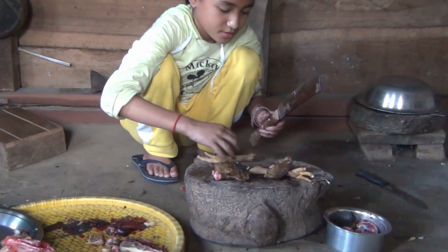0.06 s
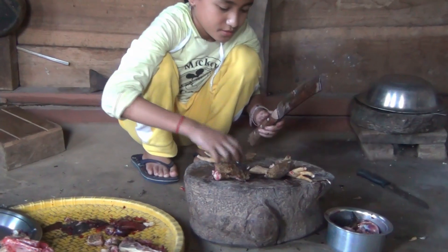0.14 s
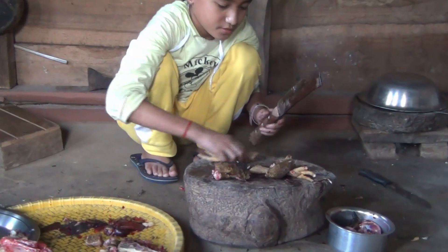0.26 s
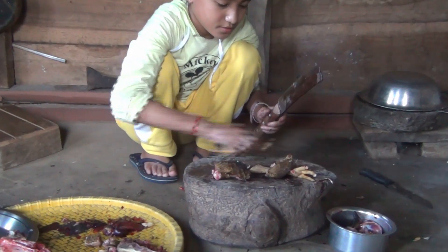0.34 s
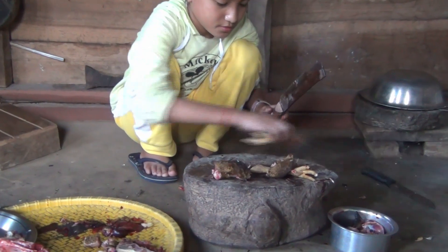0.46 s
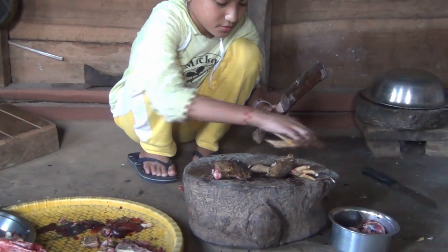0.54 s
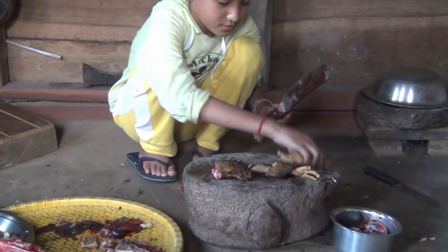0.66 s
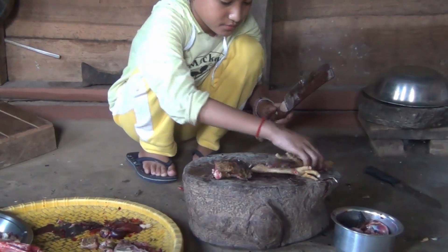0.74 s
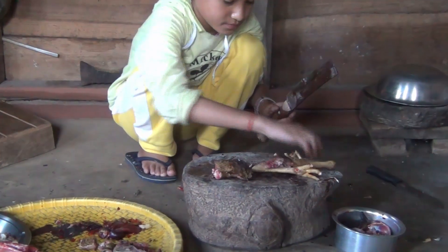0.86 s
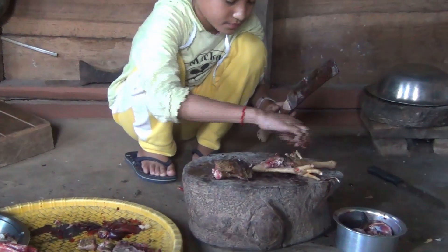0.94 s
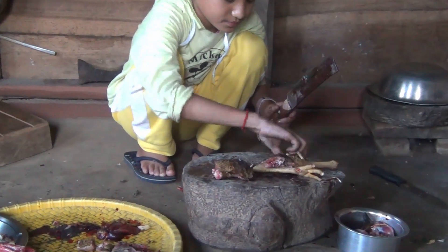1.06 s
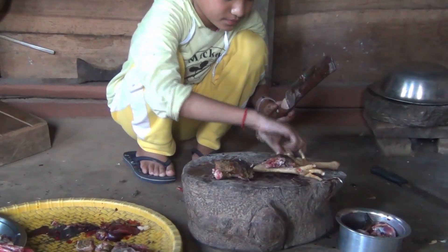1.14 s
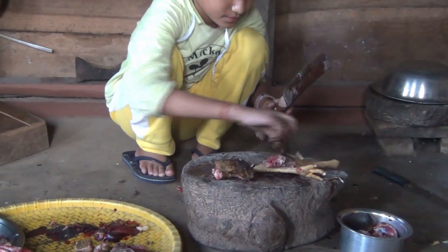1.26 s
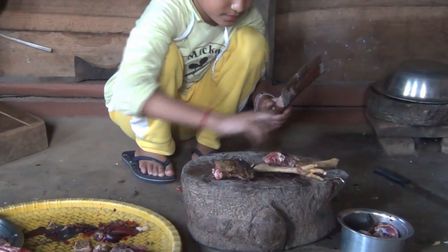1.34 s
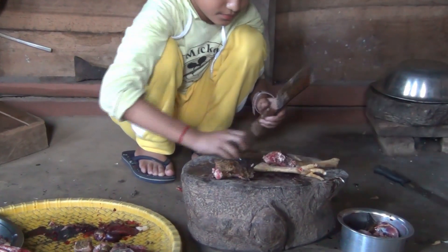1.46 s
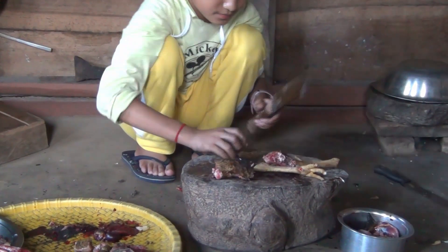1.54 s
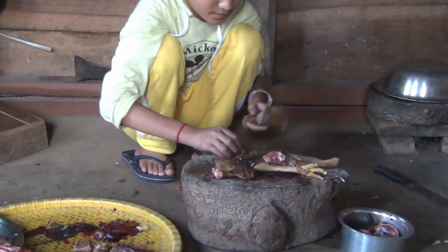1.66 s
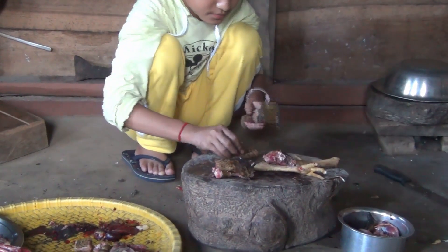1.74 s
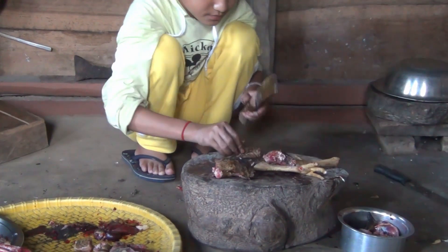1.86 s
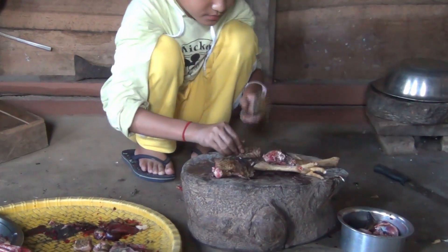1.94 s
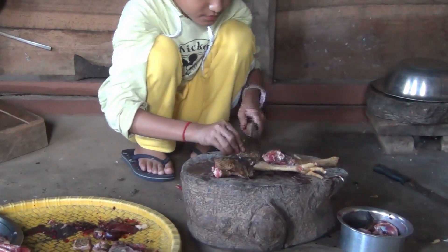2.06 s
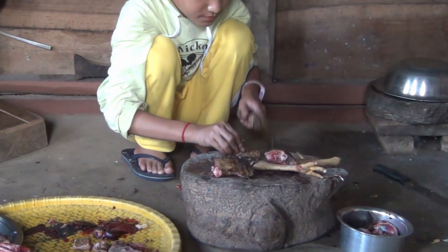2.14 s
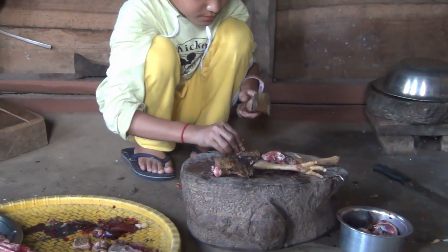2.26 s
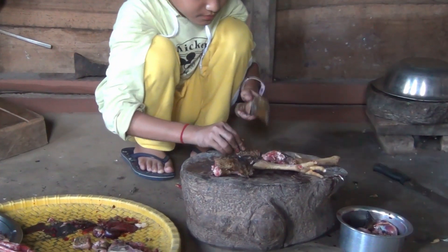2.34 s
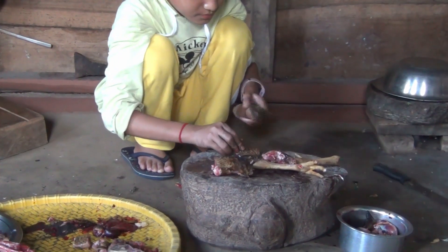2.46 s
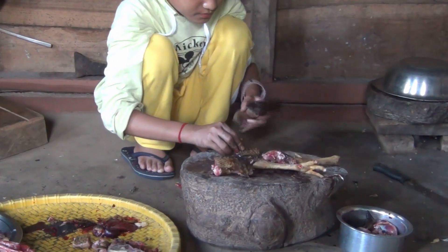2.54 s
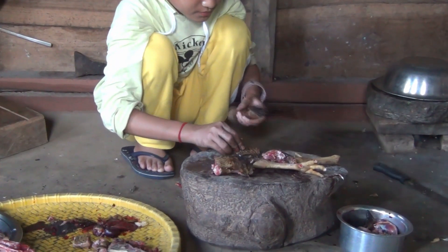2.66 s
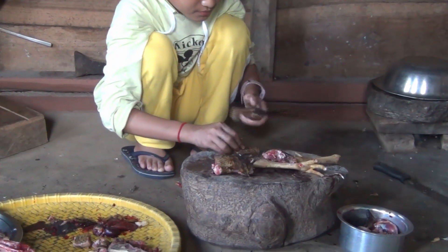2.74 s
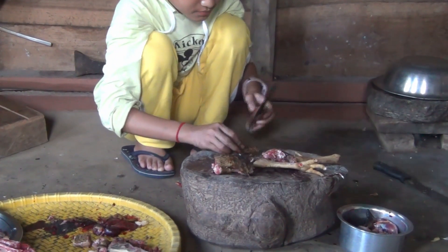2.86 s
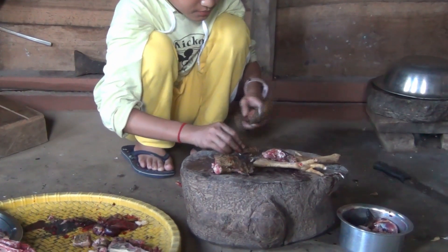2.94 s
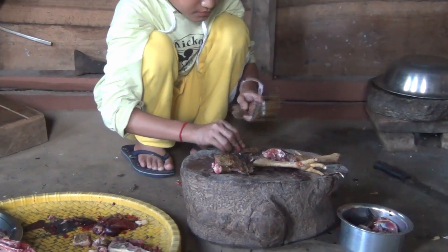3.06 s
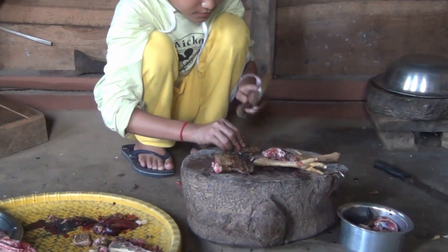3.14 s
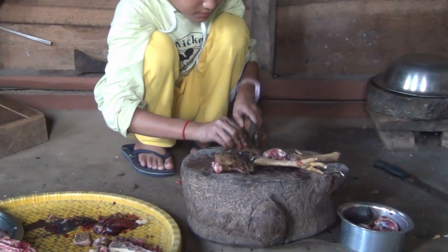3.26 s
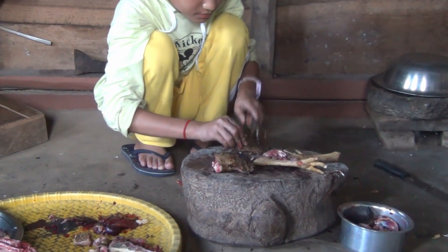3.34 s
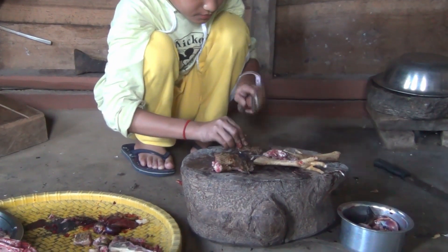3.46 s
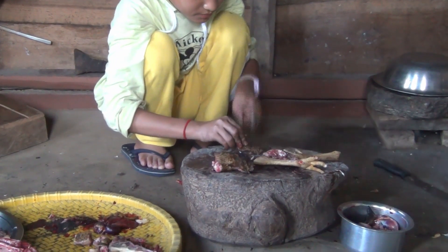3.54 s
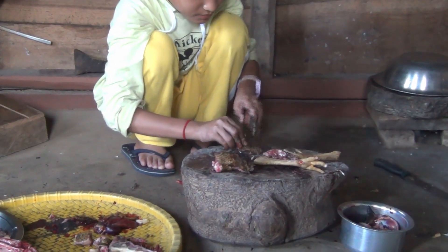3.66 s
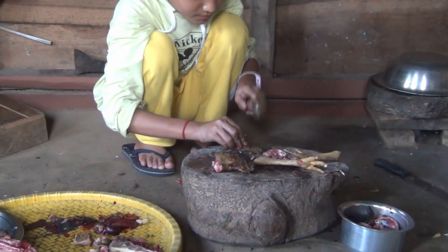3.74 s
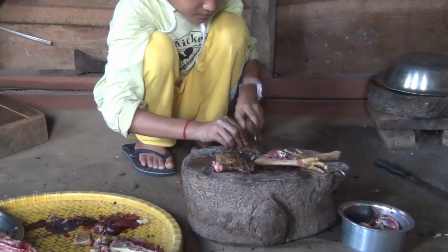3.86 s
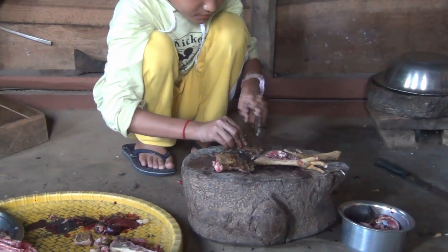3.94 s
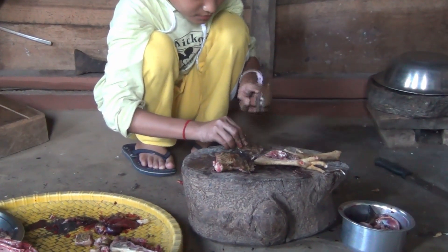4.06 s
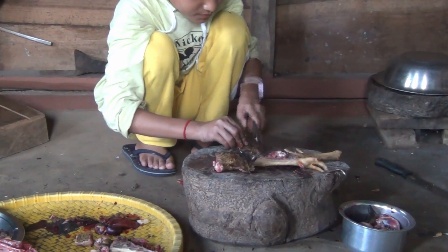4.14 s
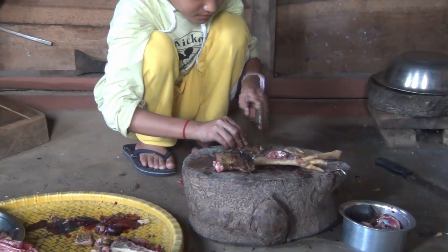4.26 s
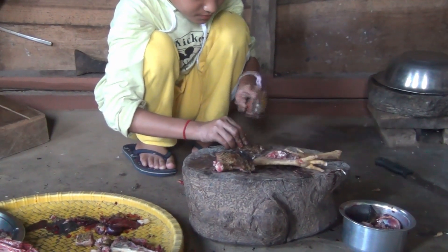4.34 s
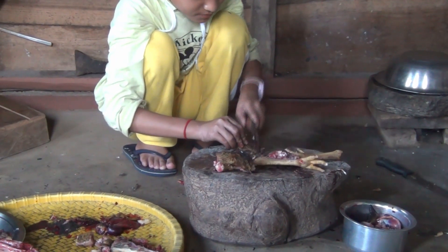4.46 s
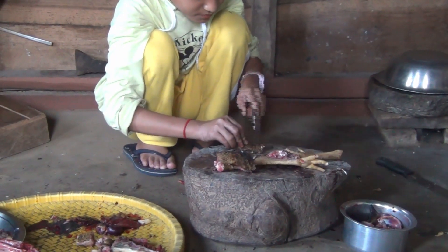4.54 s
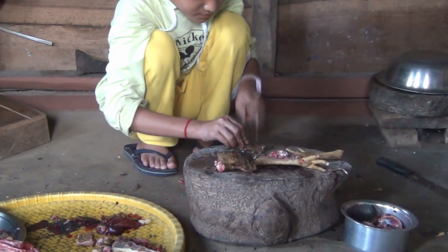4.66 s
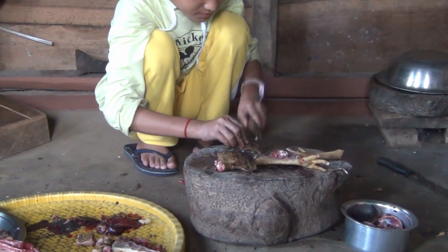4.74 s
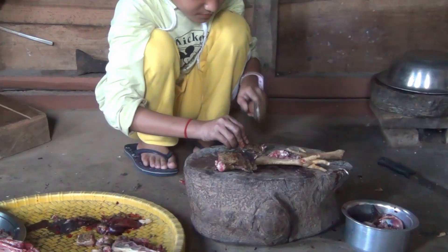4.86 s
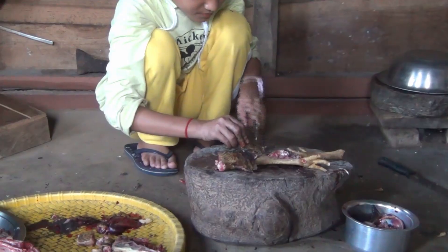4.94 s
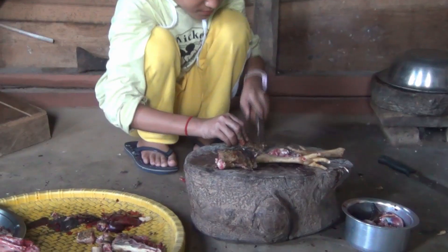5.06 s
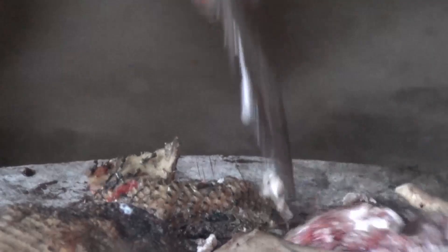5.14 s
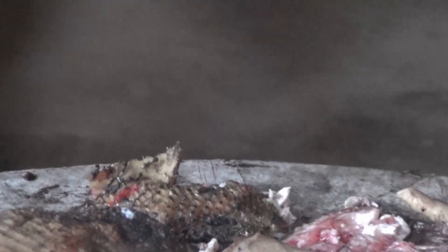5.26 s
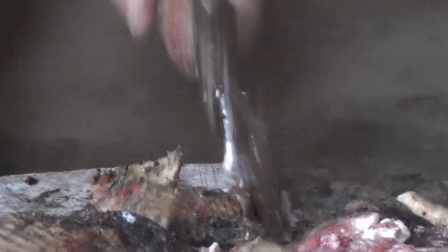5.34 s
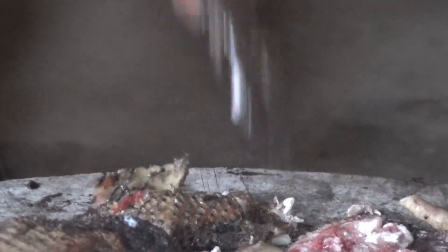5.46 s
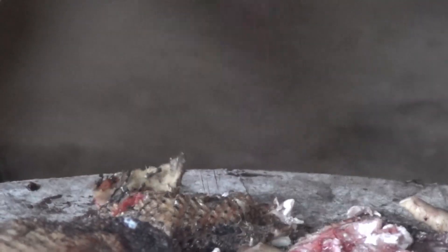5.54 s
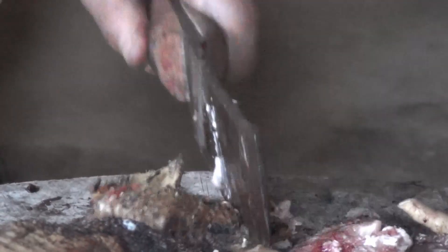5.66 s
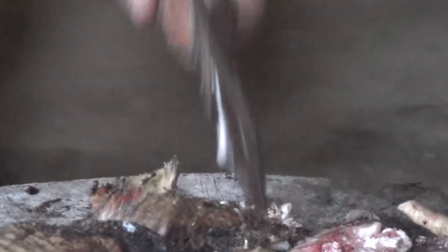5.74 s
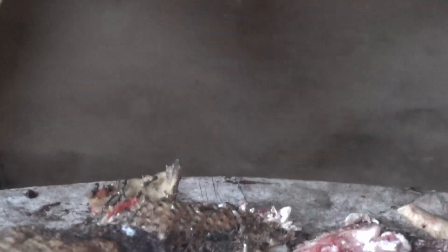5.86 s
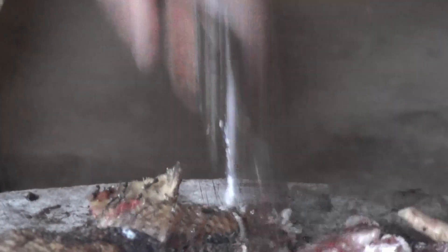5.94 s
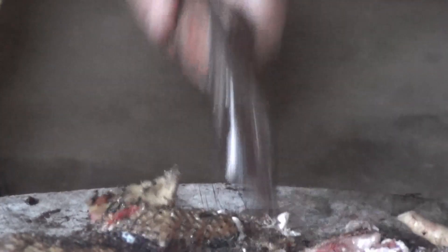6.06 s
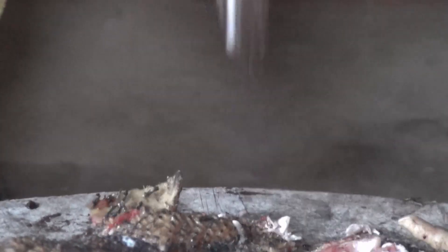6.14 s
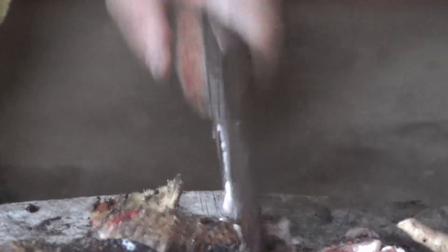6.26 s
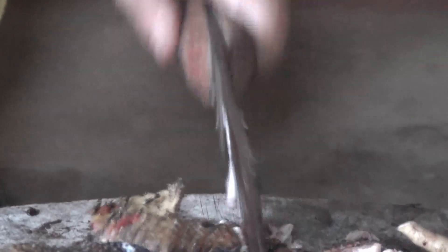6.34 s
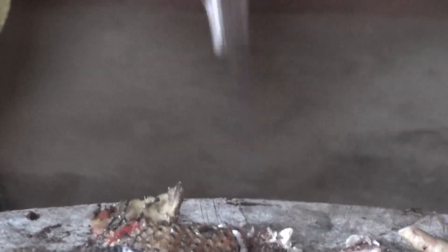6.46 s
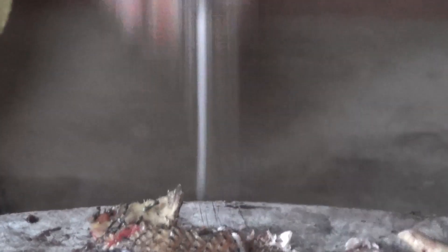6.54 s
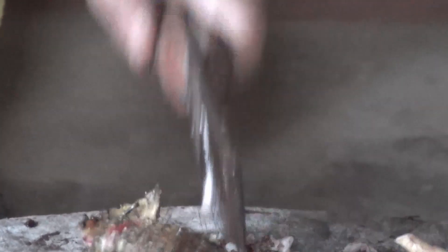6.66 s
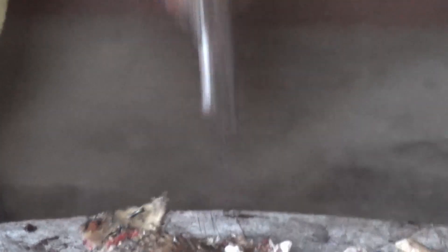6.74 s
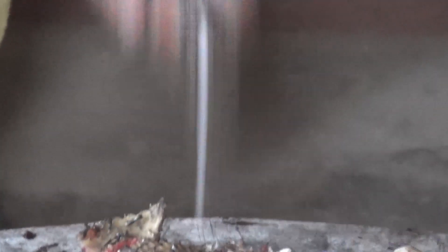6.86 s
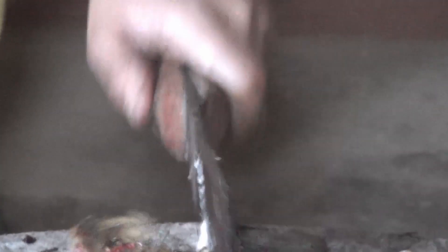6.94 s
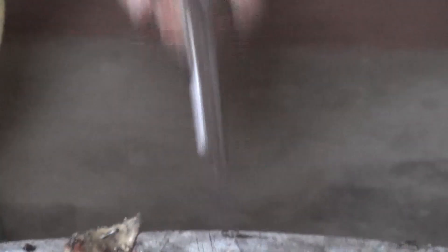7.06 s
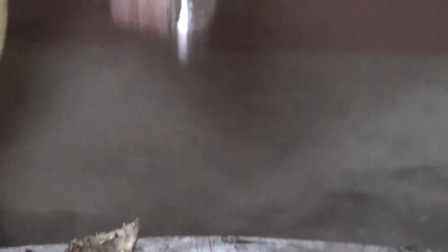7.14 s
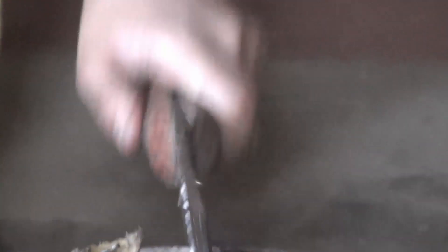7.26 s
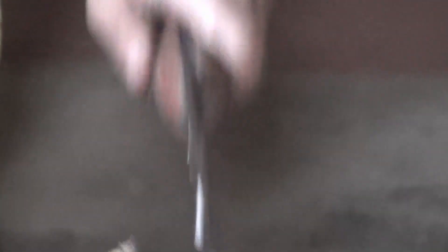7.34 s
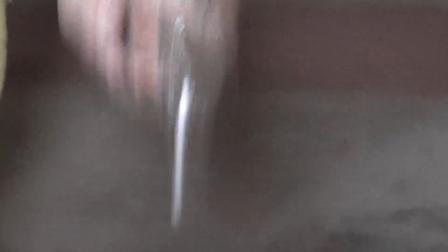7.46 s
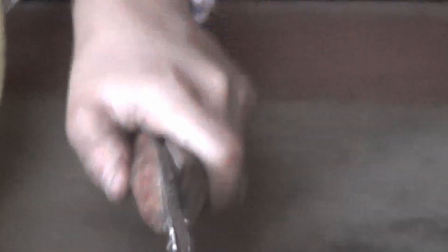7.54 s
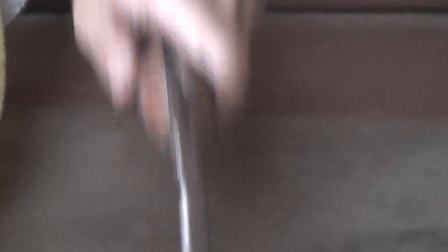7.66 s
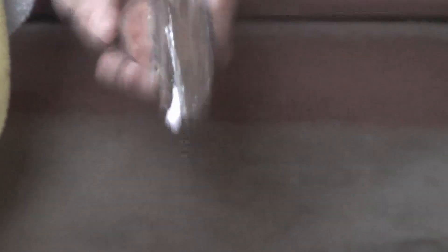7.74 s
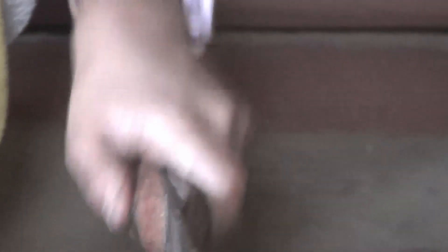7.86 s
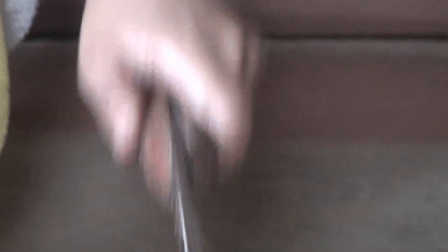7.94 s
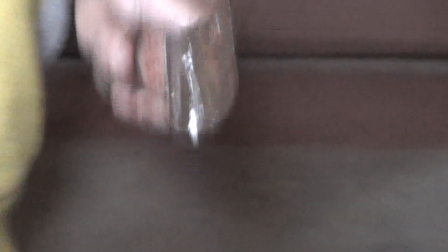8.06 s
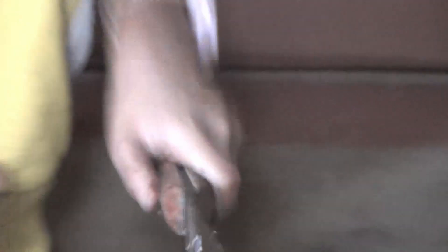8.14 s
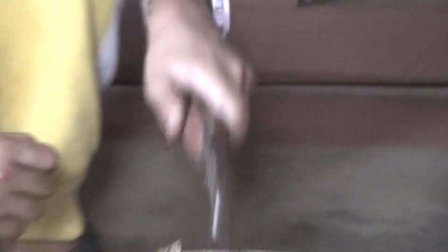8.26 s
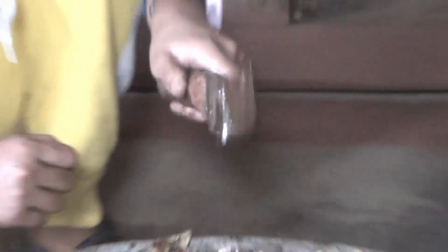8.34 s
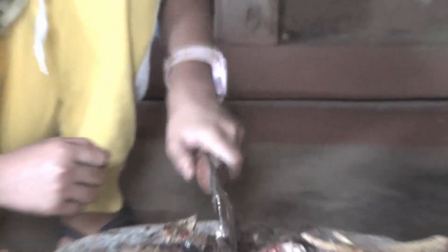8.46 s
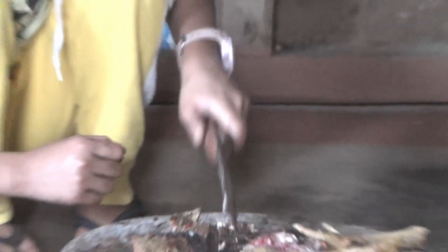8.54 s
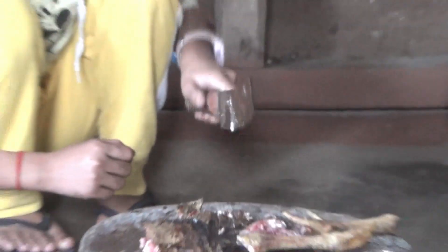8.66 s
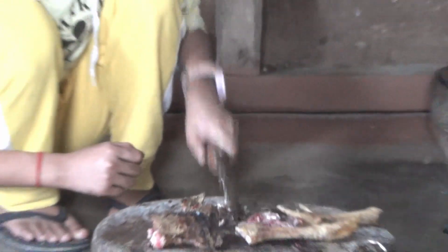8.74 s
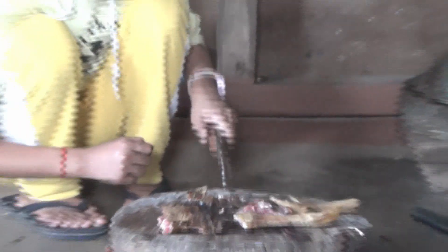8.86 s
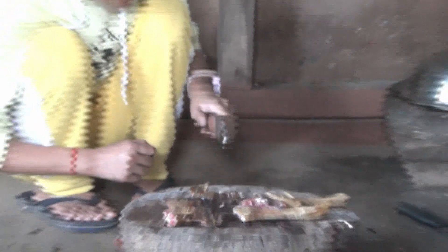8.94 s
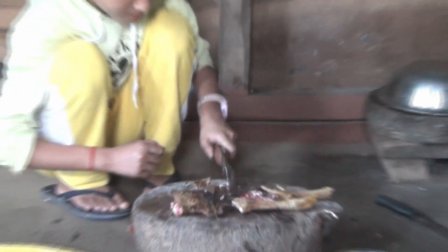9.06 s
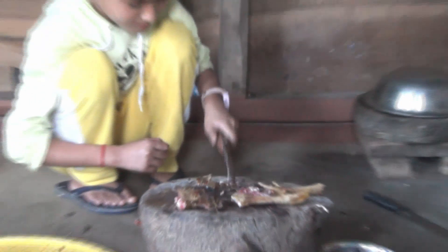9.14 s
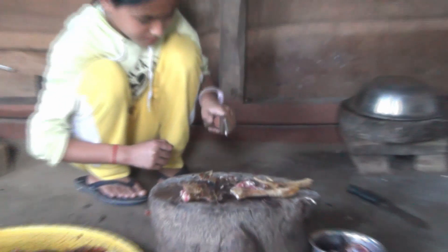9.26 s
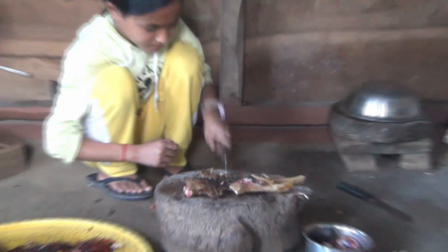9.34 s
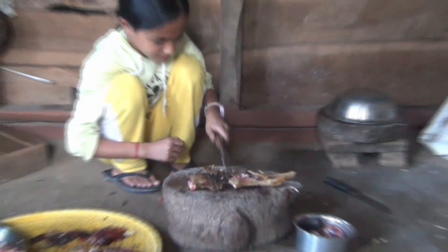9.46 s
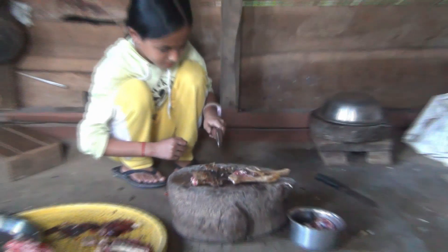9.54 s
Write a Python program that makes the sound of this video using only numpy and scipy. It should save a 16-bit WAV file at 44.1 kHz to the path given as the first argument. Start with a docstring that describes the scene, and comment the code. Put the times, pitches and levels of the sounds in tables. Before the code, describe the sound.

Quiet insect drone and airy hush with faint sticky touches of meat, then one deep trial thud on a wooden stump. After a short pause, a heavy knife begins chopping steadily, about three blows a second, crunching flesh, cracking bone and knocking wood. The microphone is close, in a plank-walled shelter with short reflections; the background sinks behind the blows.

```python
"""Chopping on a wooden stump

A heavy knife chops meat and bone in a plank-walled yard shelter: one trial blow, then about three a second.
Each blow crunches through flesh, cracks on bone or wood and thuds into the stump; walls and roof answer.
Blows are shaped pulses, splintering noise and decaying modes; small clicks and sticky touches are noise too.
Behind them cicadas drone, a bush cricket pulses and the air hums, all filtered noise; a limiter tames peaks."""
import sys
import numpy as np
from scipy import signal
from scipy.fft import rfft, irfft, next_fast_len
from scipy.io import wavfile
from scipy.ndimage import uniform_filter1d, minimum_filter1d, map_coordinates

SR = 44100
rng = np.random.default_rng(int(sys.argv[2]) if len(sys.argv) > 2 else 0)


def unload_audio(sound):
    """Save the sound as a 16-bit wav file, at the path given as the first command line argument."""
    columns = np.transpose(np.atleast_2d(sound))
    # keep every value between -1 and 1, then stretch to whole-number steps
    steps = np.round(np.clip(columns, -1, 1) * 32767)
    wavfile.write(sys.argv[1], SR, steps.astype(np.int16))


N = 423620

# Knife blows, by the energy each part takes. Each row: start in seconds, low push in dB, stump thud in dB,
# bone crack in dB, edge snap in dB.
KNIFE_BLOWS = [(2.081, 9, 23, 12, -1), (3.317, -3.5, 3.5, 8, 12), (3.6276, -1, 1.5, 15, 9.5),
               (3.9094, -1, 3, 4, 1.5), (4.195, 2, 11.5, 11, 11), (4.4666, -3.5, -8.5, 12.5, 14),
               (4.75, 5, 14.5, 7, -2), (5.0161, 2.5, 7, 6.5, 10), (5.141, -12, 6, -12, -22),
               (5.3932, 3, 10, 0, 0.5), (5.701, 2, 18, 15.5, 5), (6.0009, 0.5, 14, 5, 2.5),
               (6.3118, 4, 21, 16.5, 10.5), (6.6224, 2, -1, 5.5, 3.5), (6.9402, 4.5, 6, 6.5, 9),
               (7.2574, 2, -1.5, 9.5, 12), (7.557, 1.5, -1, 5.5, 11.5), (7.872, 4, 6.5, 12, 12),
               (8.1859, 4.5, 19, 14, 9.5), (8.4832, 3, 16.5, 14.5, 11), (8.8053, 3.5, 17.5, 13.5, 13.5),
               (9.0989, 1.5, 21.5, 15, 10.5), (9.4193, 0, 22, 14.5, 3)]
# Small dry clicks close by. Each row: start in seconds, energy in dB.
NEAR_CLICKS = [(1.424, -9), (2.0715, -7), (4.9468, 0.5), (4.9734, -4), (5.1299, -2.5), (9.381, -21)]
# Modes of the stump and shelter booming together. Each row: frequency in Hz, relative level in dB,
# 60 dB decay in seconds.
BOOM_MODES = [(193.3, -8, 0.18), (258.7, -15, 0.41), (352.5, -11, 0.27), (394, -5, 0.2), (462, -8, 0.21),
              (501, -5.5, 0.16), (538, -4.5, 0.18), (626.4, 2.5, 0.084), (662, -3.5, 0.24),
              (730, -2.5, 0.21), (783, -15, 0.17), (903, -21, 0.099), (960, 7, 0.045), (1005, -8, 0.17),
              (1102, -9, 0.17), (1220, -22, 0.25), (1635, -16, 0.098), (1794, -19, 0.18)]
# Modes of the steel blade, damped by hand and meat. Each row: frequency in Hz, relative level in dB,
# 60 dB decay in seconds.
BLADE_MODES = [(2050, -3, 0.065), (2604, -5.5, 0.11), (3680, -12, 0.056), (4880, -8.5, 0.18),
               (7400, -10, 0.13), (10060, -6.5, 0.071), (10600, -24, .22)]
# Colour of the low push of a blow. Each row: frequency in Hz, relative level in dB.
PUSH_COLOUR = [(20, -40), (60, -12.5), (85, -7), (112, -1.5), (190, 0.5), (240, -7), (320, -9), (600, -34),
               (2500, -79)]
# Colour of the knock on the stump. Each row: frequency in Hz, relative level in dB.
THUD_COLOUR = [(40, -56), (150, -24.5), (330, -5), (520, 4), (740, 5), (1020, -4), (1300, -7), (2000, -35),
               (5000, -39), (12000, -76)]
# Colour of the bone crack. Each row: frequency in Hz, relative level in dB.
CRACK_COLOUR = [(60, -50), (500, -17.5), (1250, -12), (1750, 2.5), (2100, -2), (2400, -4), (2900, -0.5),
                (4200, -3.5), (6000, -14.5), (14000, -33)]
# Colour of the edge snap. Each row: frequency in Hz, relative level in dB.
SNAP_COLOUR = [(200, -67), (2500, -18), (5000, -1), (7300, 4), (8600, 0), (10500, 2.5), (13000, -3),
               (15000, -9), (16000, -28)]
# Colour of the near clicks. Each row: frequency in Hz, relative level in dB.
CLICK_COLOUR = [(300, -7), (900, -9), (1600, -2), (2400, -8), (3300, -6), (4500, -25), (14000, -43)]
# Diffuse tail of the shelter. Each row: frequency in Hz, 60 dB decay in seconds.
SHELTER_DECAY = [(100, 0.32), (260, 0.46), (700, 0.31), (1840, .23), (4850, 0.21), (12800, .18)]
# Distinct wall echoes. Each row: delay in seconds, gain before the wall setting of each sound.
WALL_ECHOES = [(.0055, 0.37), (0.0133, 0.5), (0.016, 0.48), (.0335, 0.45)]
# Colour of the outdoor hush. Each row: frequency in Hz, relative level in dB.
AIR_COLOUR = [(25, -10.5), (70, -6.5), (108, -1.5), (150, -3.5), (230, -2.5), (350, -1.5), (480, -7.5),
              (750, -7), (1500, -11), (3300, -15), (6000, -23), (10000, -25), (14500, -28.5), (16000, -35)]
# Bands of the cicada chorus. Each row: centre in Hz, width in Hz, relative level in dB.
CICADA_BANDS = [(4505, 590, -3), (4790, 370, 0), (7180, 300, -12.5), (7650, 820, -17), (8200, 330, -18.5)]
# Gain of insects and air, which drops as the steady chopping starts. Each row: time in seconds, gain in dB.
BACKGROUND_GAIN = [(2.05, 1), (2.25, -1), (3.294, 1.5), (3.298, -10.5), (7, -9), (9.6, -11)]
# Swells of a distant low hum. Each row: centre in seconds, level in dB before the background gain,
# half length in seconds.
HUM_SWELLS = [(1.2, -43, 0.39), (3.15, -47.5, 0.64)]
# Fingers shift the meat on the stump. Each row: centre in seconds, level in dB, brightness in dB per octave.
MEAT_TOUCHES = [(.8, -48.5, 0), (1.28, -43.5, -2), (1.58, -46.5, -1), (1.88, -45, -2), (2.7, -44.5, 10),
                (4.7, -50.5, -3), (5.1, -50, -4)]
# Colour of those touches before the brightness tilt. Each row: frequency in Hz, relative level in dB.
RUSTLE_COLOUR = [(600, -28), (1500, 0), (3000, 10), (4500, -8), (9000, -2.5), (15000, -20)]

TIME = np.arange(N) / SR  # whole scene, seconds
T = TIME[:SR // 2]  # half a second, for one blow

# a blow that goes straight through to the wood tears less (dB, then dB per dB)
CRUNCH_DB, CRUNCH_PER_SNAP, CRUNCH_LOSS_PER_THUD = -3, 0.25, 0.45
# hard contact brightens the thud (dB per octave, then the same per dB of crack)
THUD_TILT_DB, THUD_TILT_PER_CRACK = -4.5, 0.42
# the deeper the edge sinks into wood, the duller the crack (dB per octave, then the same per dB of depth)
CRACK_TILT_DB, CRACK_TILT_PER_DEPTH = 1, 0.38
THUD_HZ, CRACK_HZ, RUSTLE_HZ = 620, 2730, 5000  # brightness turns about these
BLADE_DB = -12  # blade ring relative to the edge snap
FLESH_LEAD_S, BONE_LAG_S, WOOD_LAG_S = 0.0036, 0.0003, 0.00098  # the edge meets flesh, then bone, then wood
TOUCH_S = 0.059  # half the length of one touch
# cricket level before its beat and the background gain
CRICKET_DB, CRICKET_HZ = -56, 9430
CRICKET_FIRST_S, CRICKET_STOP_S, CRICKET_PERIOD_S = 0.442, 5.1, 0.277
RUMBLE_DB, RUMBLE_SWING_DB = -50.5, 3  # before the background gain
TOP_HZ = 16400  # nothing remains above


def knife():
    """Blows that reach the wood thud and boom; those stopped by bone crunch, crack and ring the blade."""
    out = np.zeros(N)
    for s, push_db, thud_db, crack_db, snap_db in KNIFE_BLOWS:
        depth_db = thud_db - snap_db
        crunch_db = CRUNCH_DB + CRUNCH_PER_SNAP * snap_db - CRUNCH_LOSS_PER_THUD * thud_db
        crack_tilt_db = CRACK_TILT_DB - CRACK_TILT_PER_DEPTH * depth_db
        bone_colour = lean(CRACK_COLOUR, CRACK_HZ, crack_tilt_db)

        push = shelter(pulse(PUSH_COLOUR), wet_db=1.5, walls=1.0)
        crack = shelter(fracture(bone_colour, t60=0.018, splinter_db=2.5), wet_db=-4.0, walls=0.24)
        snap = shelter(fracture(SNAP_COLOUR, t60=0.017, splinter_db=4.5), wet_db=-3, walls=0.077)
        blade = ring(BLADE_MODES, rise=0.00061)
        flesh = shelter(crunch(FLESH_LEAD_S), wet_db=-0.5, walls=0.16)
        thud = stump(THUD_TILT_DB + THUD_TILT_PER_CRACK * crack_db)

        edge = snap + amp(BLADE_DB) * blade
        add(out, s - FLESH_LEAD_S, amp(crunch_db) * flesh)
        add(out, s + BONE_LAG_S, amp(crack_db) * crack + amp(snap_db) * edge)
        add(out, s + WOOD_LAG_S, amp(push_db) * push + amp(thud_db) * thud)
    return out


def crunch(lead):
    """Tearing noise: the edge rips through skin and flesh, building until it lands, then dying fast."""
    build = np.minimum(T / lead, 1) ** 0.5
    release = fade(np.maximum(T - lead, 0), 0.0024)
    tearing = rng.standard_normal(len(T)) * build * release
    colour = pulse(CRACK_COLOUR) + amp(-3.0) * pulse(SNAP_COLOUR) + amp(-22) * pulse(THUD_COLOUR)
    return packet(through(tearing, colour))


def fracture(spectrum, t60, splinter_db):
    """One main break, then a dying burst of irregular splinters, splinter_db relative to the break."""
    uneven = amp(3 * rng.standard_normal(len(T)))
    splinters = rng.standard_normal(len(T)) * uneven
    breaks = signal.unit_impulse(len(T)) + amp(splinter_db) * packet(splinters * fade(T, t60))
    return packet(through(breaks, pulse(spectrum)))


def stump(tilt_db):
    """A short wooden knock, its wall echoes and the boom that builds behind it."""
    knock = shelter(pulse(lean(THUD_COLOUR, THUD_HZ, tilt_db)), wet_db=4.5, walls=1.47)
    boom = ring(lean(BOOM_MODES, THUD_HZ, tilt_db), rise=0.0098)
    return packet(knock + boom)


def ring(modes, rise):
    """Decaying modes, struck with new strengths and phases each time; rise in seconds softens the onset."""
    hz, db, t60 = np.transpose(modes)[:, :, None]
    phases = rng.uniform(0, 2 * np.pi, hz.shape)
    strengths = amp(db + 2.5 * rng.standard_normal(db.shape))
    partials = strengths * fade(T, t60) * np.sin(2 * np.pi * hz * T + phases)
    return packet(partials.sum(0) * (1 - np.exp(-T / rise)))


def shelter(x, wet_db, walls):
    """Direct sound, distinct wall echoes and a diffuse tail with its own decay at each frequency."""
    hz, t, z = signal.stft(rng.standard_normal(len(T)), SR, nperseg=256)
    decay = fade(t, along(SHELTER_DECAY, hz)[:, None])
    tail = signal.istft(z * decay, SR, nperseg=256)[1][:len(T)]
    paths = signal.unit_impulse(len(T))
    for delay, gain in WALL_ECHOES:
        add(paths, delay, np.array([walls * gain]))
    build = 1 - np.exp(-T / 0.0026)
    diffuse = through(x, tail * build)
    return packet(through(packet(x), paths) + amp(wet_db) * packet(diffuse))


def clicks():
    """Light clicks with long splintering, so near that they hardly stir the shelter."""
    out = np.zeros(N)
    for s, db in NEAR_CLICKS:
        click = fracture(CLICK_COLOUR, t60=0.024, splinter_db=17)
        add(out, s, amp(db) * shelter(click, wet_db=-19, walls=0.042))
    return out


def handling():
    """Faint sticky crackle of skin and flesh at each touch: noise whose level flutters quickly."""
    crackle = rng.standard_normal(N) * amp(4.6 * wobble(250))
    out = np.zeros(N)
    for s, db, tilt_db in MEAT_TOUCHES:
        colour = lean(RUSTLE_COLOUR, RUSTLE_HZ, tilt_db)
        touch = unit(filtered(crackle, lambda hz: amp(along(colour, hz))))
        out += amp(db) * swell(s, TOUCH_S) * touch
    return out


def insects():
    """A gently flickering cicada chorus and one thin, pulsing bush cricket that stops halfway."""
    chorus_db = -39.5 + 0.23 * wobble(2.93) + 1.4 * wobble(40)
    chorus = noise_bands(CICADA_BANDS) * amp(chorus_db)
    beat = np.abs(np.cos(np.pi * (TIME - CRICKET_FIRST_S) / CRICKET_PERIOD_S)) ** 3
    cricket = amp(CRICKET_DB) * noise_bands([(CRICKET_HZ, 200, 0)]) * beat
    return chorus + cricket * (TIME < CRICKET_STOP_S)


def air():
    """Outdoor hush, a rumble that swells and sinks, and a far hum that comes and goes, all from noise."""
    hush = unit(filtered(rng.standard_normal(N), lambda hz: amp(along(AIR_COLOUR, hz))))
    hush *= amp(-39.5 + 0.48 * wobble(2.64))
    rumble = noise_bands([(106.0, 22, 0)]) * amp(RUMBLE_DB + RUMBLE_SWING_DB * wobble(1.89))
    hum_level = sum(amp(db) * swell(s, half_length) for s, db, half_length in HUM_SWELLS)
    hum = noise_bands([(173.4, 26, 5.5), (207, 25, 3)]) * hum_level
    return hush + rumble + hum


def noise_bands(bands):
    """Noise narrowed to (Hz, width Hz, dB) bands, as when many distant sources merge."""
    def response(f):
        """Sum of rounded peaks."""
        total = 0
        for hz, width, db in bands:
            offset = (f - hz) / width
            total = total + amp(db) / (1 + (2 * offset) ** 2) ** 0.5 / (1 + offset ** 2)
        return total
    return unit(filtered(rng.standard_normal(N), response))


def amp(db):
    """Decibels to gain."""
    return 10 ** (np.asarray(db) / 20)


def unit(x):
    """Scale to rms 1."""
    return x / np.sqrt(np.mean(x ** 2) + 1e-20)


def packet(x):
    """Scale to energy 1."""
    return x / (np.linalg.norm(x) + 1e-20)


def along(points, hz):
    """Read (Hz, value) points on a log frequency axis."""
    f, v = np.transpose(points)
    return np.interp(np.log(hz + 1), np.log(f + 1), v)


def lean(rows, pivot_hz, tilt_db):
    """Tilt a (Hz, dB, ..) table over the octave on each side of the pivot, level beyond."""
    out = np.array(rows, float)
    out[:, 1] += tilt_db * np.clip(np.log2(out[:, 0] / pivot_hz), -1, 1)
    return out


def curve(rows):
    """Draw (s, value) rows as one value per sample."""
    return np.interp(TIME, *np.transpose(rows))


def wobble(rate):
    """A smooth random curve, rate knots a second."""
    knots = rng.standard_normal(int(N * rate / SR) + 4)
    return map_coordinates(knots, [TIME * rate])


def swell(s, half_length):
    """A smooth rise and fall about time s."""
    return np.exp(-((TIME - s) / half_length) ** 2)


def fade(t, t60):
    """Exponential decay that loses 60 dB in t60 seconds."""
    return np.exp(-np.log(1000) * t / t60)


def filtered(x, response):
    """Shape the spectrum of x by a response of frequency, padded against wrap-around."""
    m = next_fast_len(N + SR // 2)
    return irfft(rfft(x, m) * response(np.fft.rfftfreq(m, 1 / SR)), m)[:N]


def pulse(spectrum, size=4096):
    """The tightest causal (minimum-phase) pulse with this colour, by folding its cepstrum."""
    cepstrum = irfft(np.log(amp(along(spectrum, np.fft.rfftfreq(size, 1 / SR)))))
    cepstrum[1:size // 2] *= 2
    cepstrum[size // 2 + 1:] = 0
    return packet(irfft(np.exp(rfft(cepstrum))))


def through(x, response):
    """Convolve, keeping half a second."""
    return signal.fftconvolve(x, response)[:len(T)]


def add(track, s, sound):
    """Mix a sound in at time s."""
    part = track[max(round(s * SR), 0):][:len(sound)]
    part += sound[:len(part)]


def scene():
    """The chopping in front of its background."""
    foreground = knife() + clicks() + handling()
    background = amp(curve(BACKGROUND_GAIN)) * (insects() + air())
    return (foreground + background)[None]


def record(dry):
    """A fast limiter holds the blows at full scale, then the top of the treble is rolled off."""
    needed = 1 / np.maximum(np.abs(dry[0]), 1)
    gain = uniform_filter1d(minimum_filter1d(needed, size=25), size=25)  # sizes in samples
    return filtered(dry[0] * gain, lambda hz: np.clip((TOP_HZ - hz) / 700, 0, 1))[None]


dry = scene()
out = record(dry)
unload_audio(out)
```